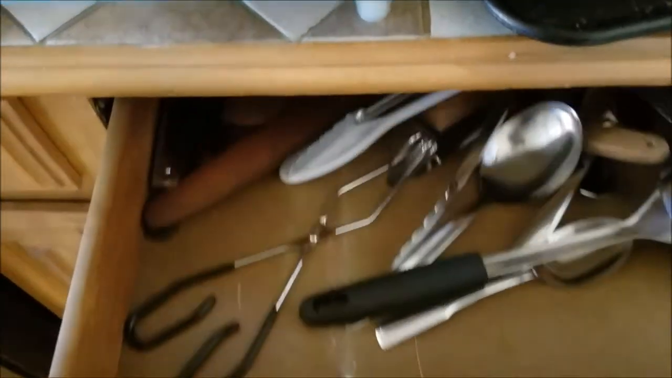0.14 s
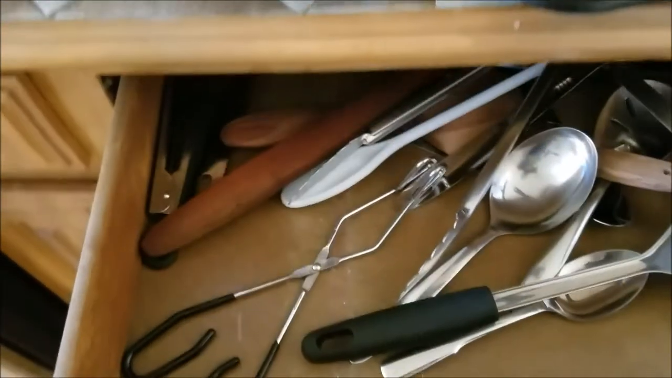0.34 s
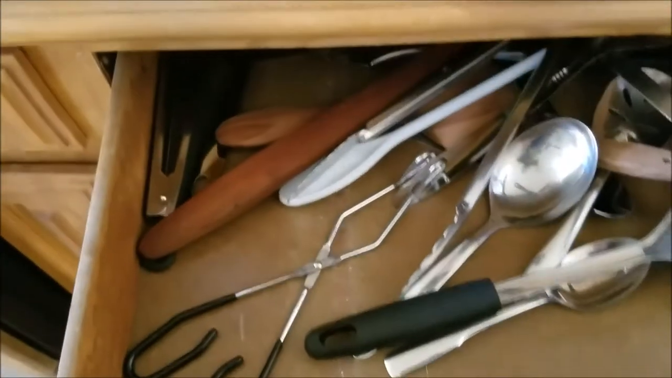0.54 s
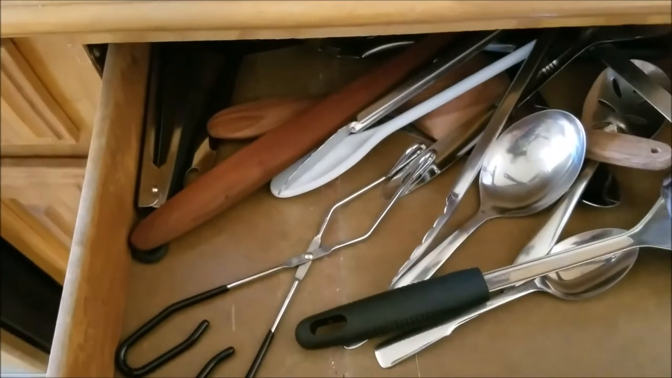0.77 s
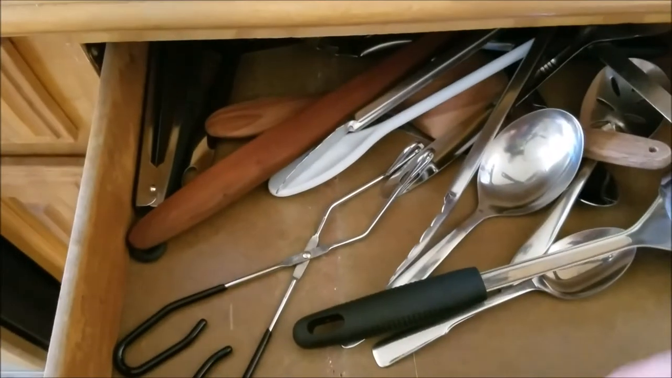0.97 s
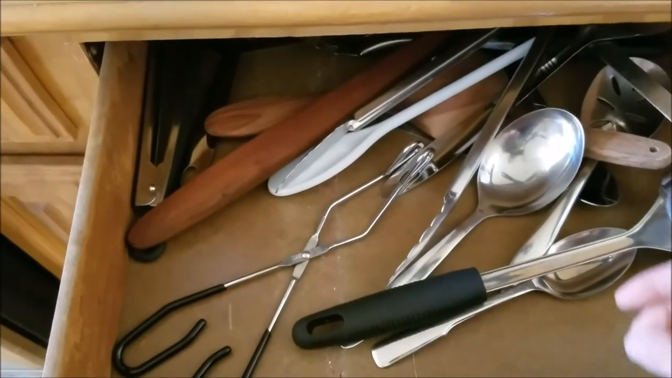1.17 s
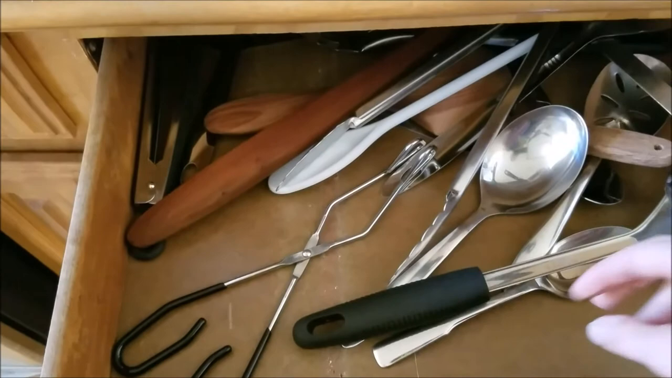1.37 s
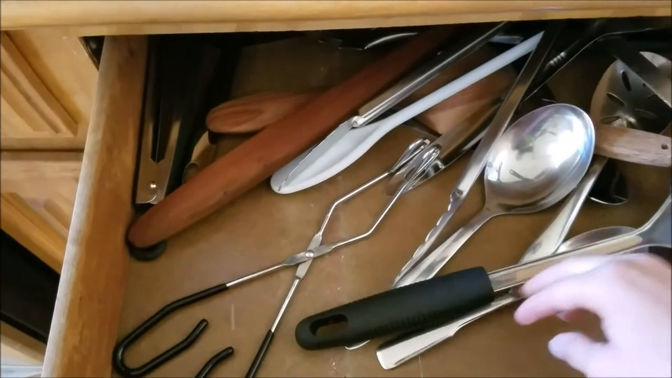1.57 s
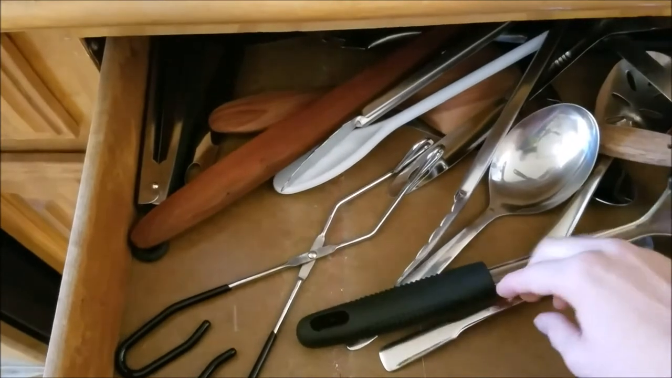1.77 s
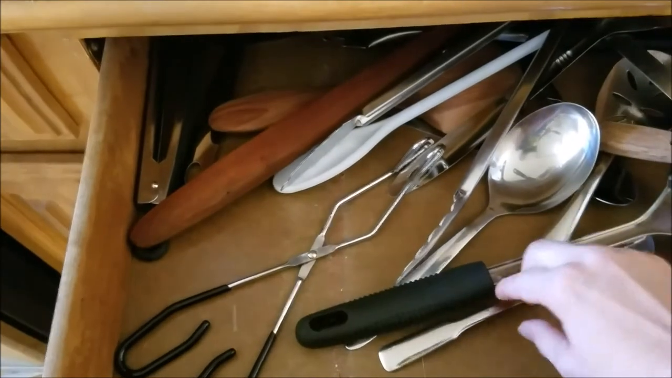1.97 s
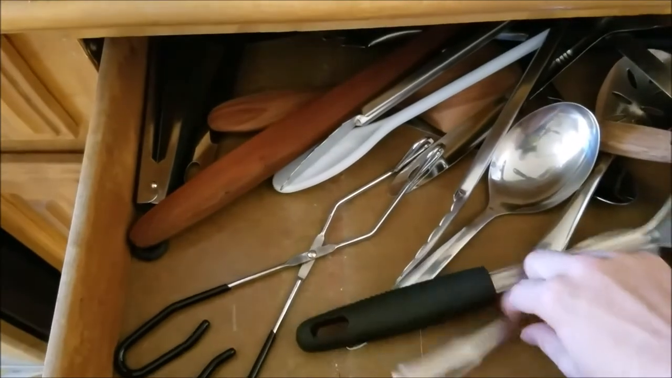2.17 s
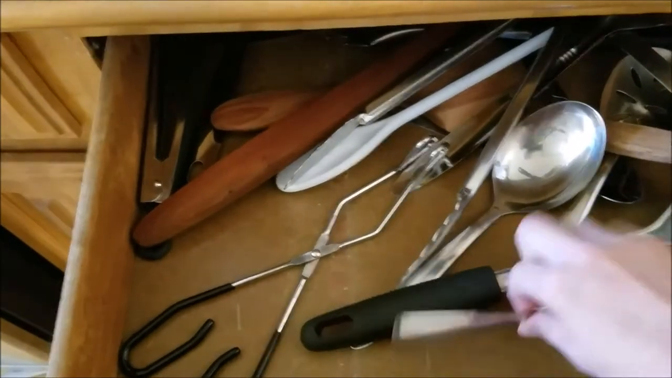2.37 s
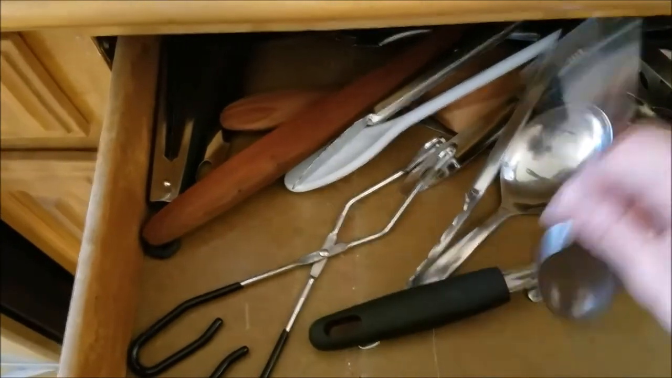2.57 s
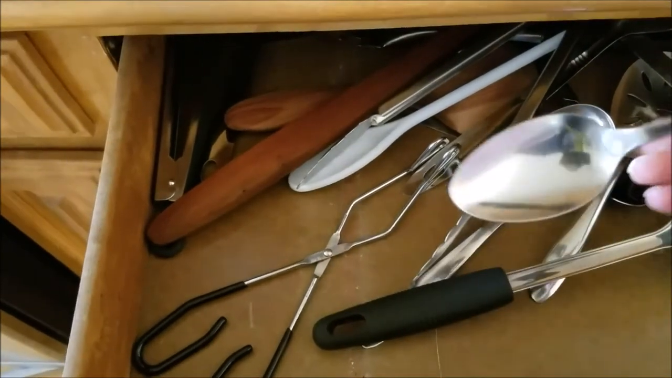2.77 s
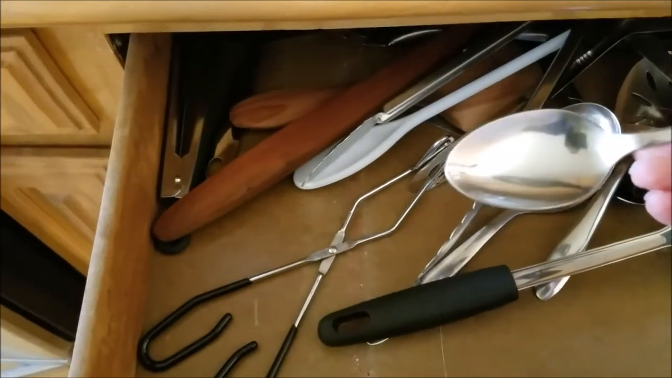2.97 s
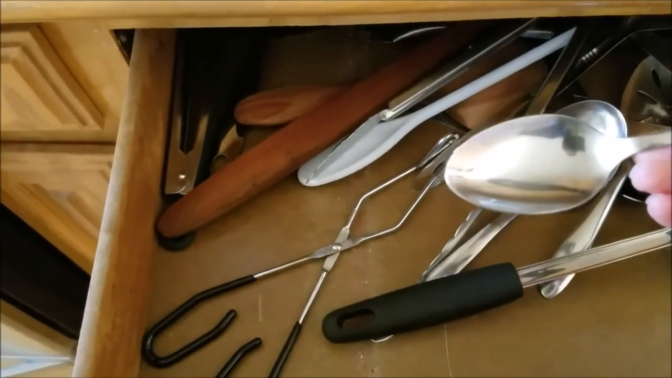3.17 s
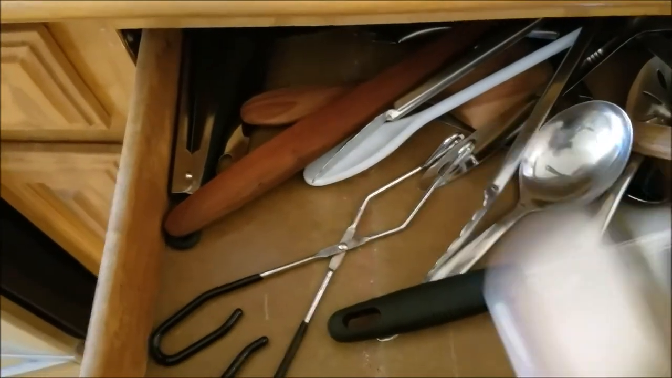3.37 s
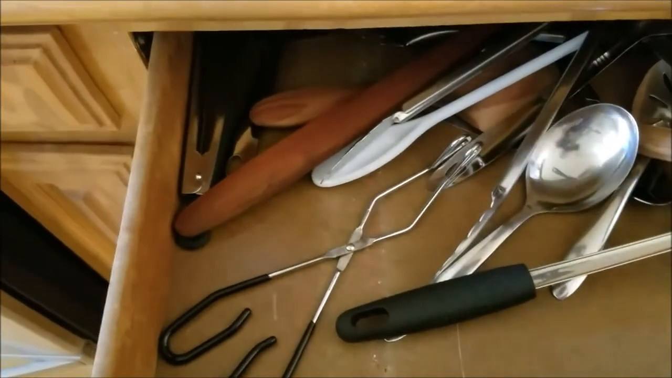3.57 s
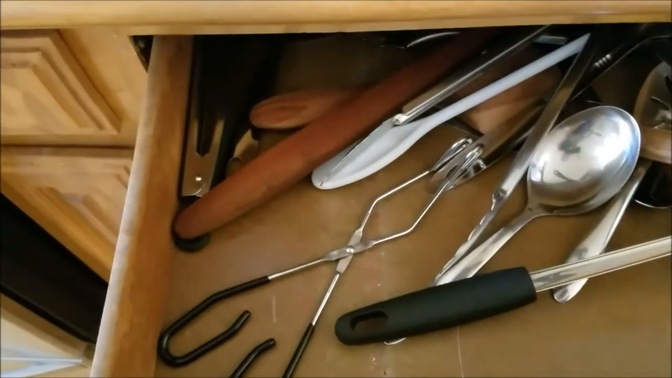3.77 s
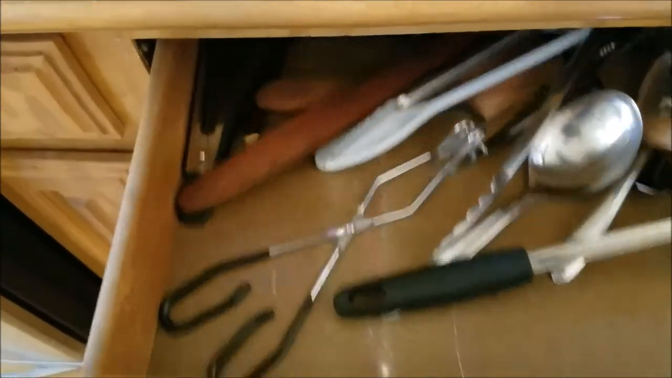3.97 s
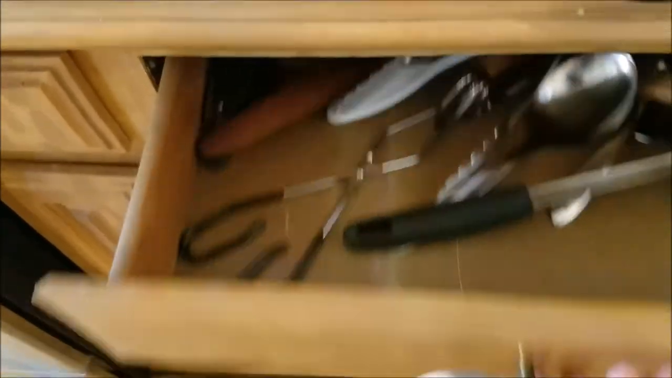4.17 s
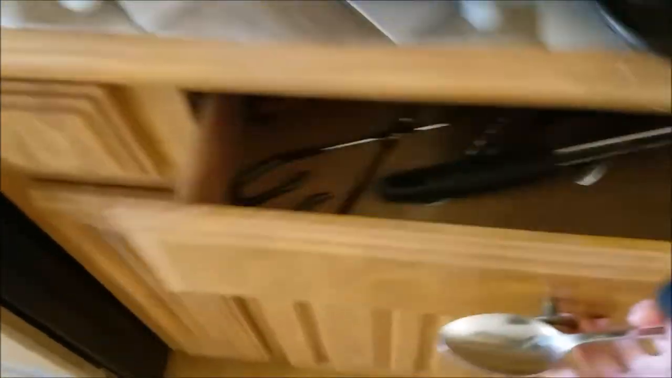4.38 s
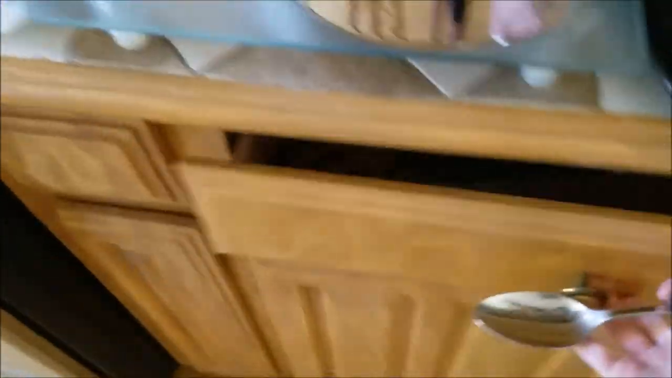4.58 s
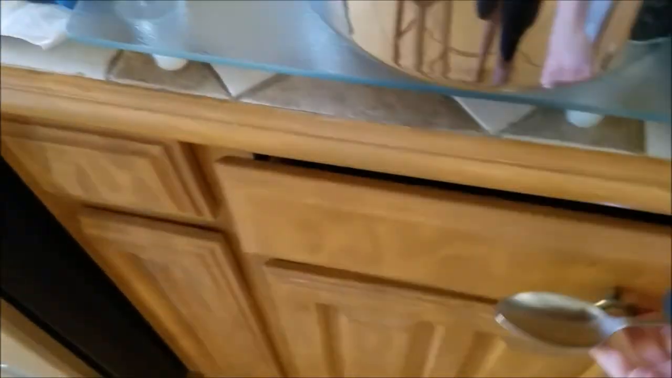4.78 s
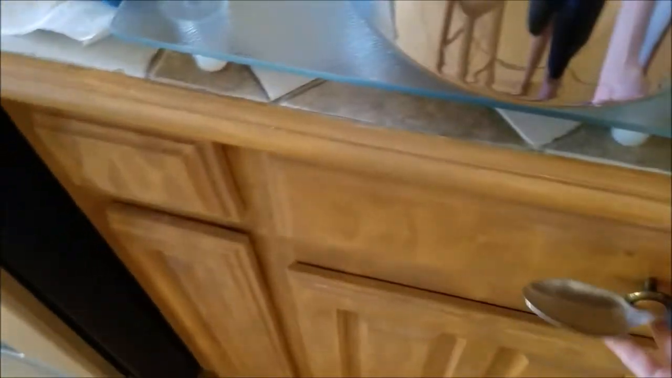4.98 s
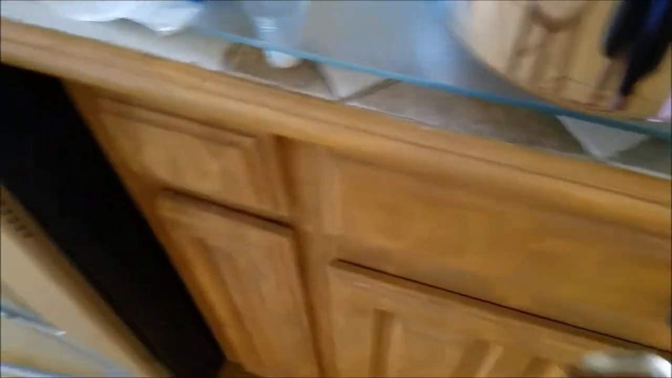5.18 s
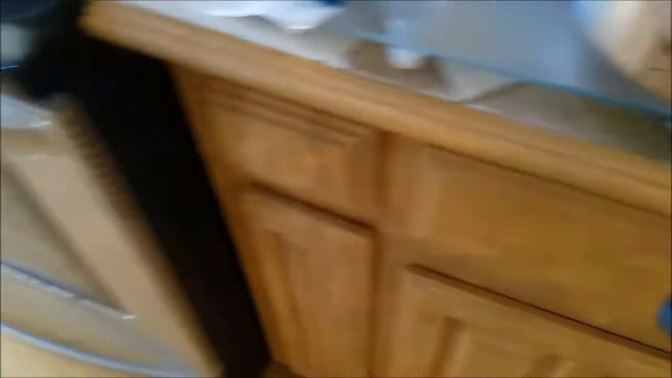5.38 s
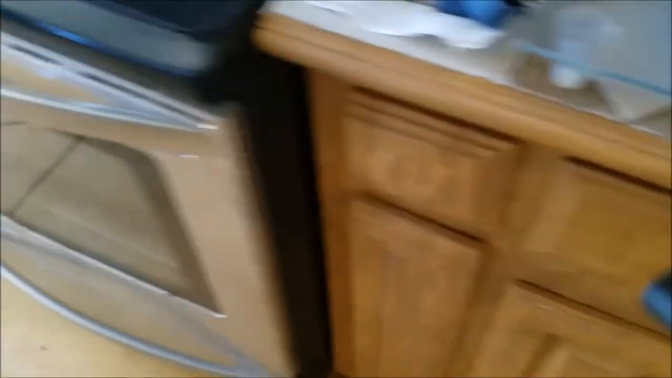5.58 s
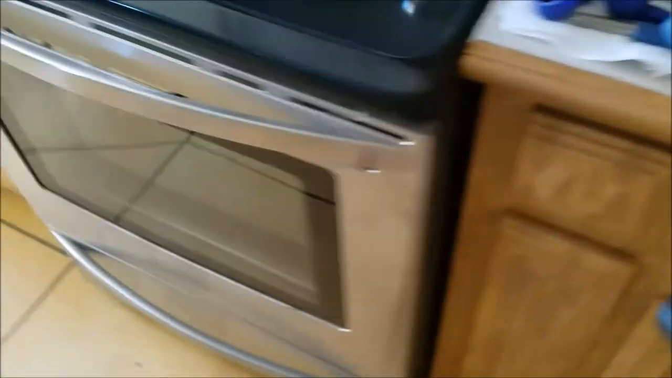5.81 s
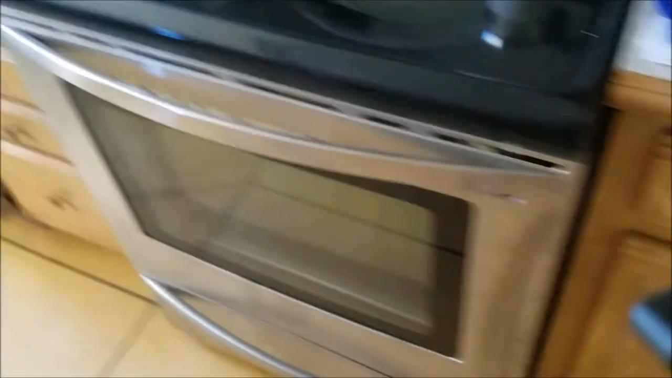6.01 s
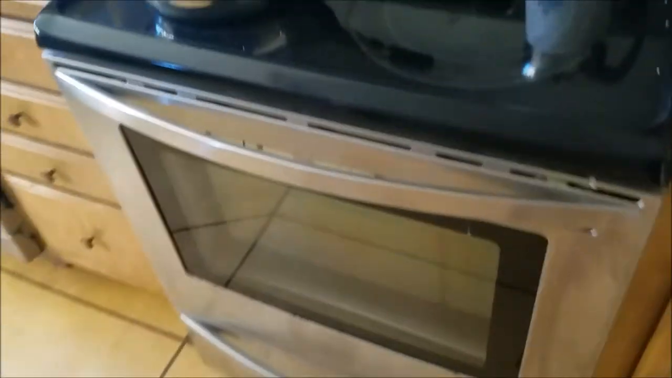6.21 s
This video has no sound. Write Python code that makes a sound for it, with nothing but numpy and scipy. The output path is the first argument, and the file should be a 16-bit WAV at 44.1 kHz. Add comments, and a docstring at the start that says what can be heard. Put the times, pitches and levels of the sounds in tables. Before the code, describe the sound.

In a quiet kitchen with low hum and faint hiss, close stereo microphones catch a wooden drawer sliding open from 0 to 0.5 s, with rough wood rubbing, a skid and sharp knocks at about 0.14, 0.2 and 0.4 s, and fine steel rattling. From 0.67 to 1.6 s a utensil rocks on the drawer bottom in soft dull taps, slightly quickening and fading. Fingers make light handle knocks at 1.65-1.7 s, then small ticks and scrapes from 2.1 s lead to a strong woody clack with a brief bright spoon clink at 2.4 s. Near silence and a tiny cloth rustle follow. A hollow handle knock comes at 3.77 s. From 4 s the drawer rolls shut, scraping and rattling most around 4.15-4.45 s, and closes with a double thump at 4.93-4.99 s. Short reverberation, soft cloth movement near 5.4 s and faint knocks at 5.8-5.9 s end it.

```python
"""In a quiet kitchen a wooden drawer slides open and its steel utensils shift and rock; a hand lifts a
spoon out, a handle is knocked, and the drawer rolls shut with a double bump, heard by two close microphones.
Contact forces set the damped modes of wood, handles and steel ringing; rubbing is dense random impacts.
Cloth, steady air noise and the reverberation of the room are shaped noise."""
import sys
import numpy as np
from scipy import signal
from scipy.fft import rfft, irfft
from scipy.io import wavfile

SR = 44100
rng = np.random.default_rng(int(sys.argv[2]) if len(sys.argv) > 2 else 0)


def inscribe(sig):
    """Save sig as 16-bit PCM at rate SR to the path in sys.argv[1].

    A 1-D sig is mono; a 2-D sig holds one channel per row.
    Samples are clipped to [-1, 1] before scaling.
    """
    pcm = np.round(np.clip(np.atleast_2d(sig).T, -1, 1) * 32767)
    wavfile.write(sys.argv[1], SR, pcm.astype(np.int16))


N = 275492  # samples

# damped modes of the cabinet, drawer board, panel and the handles lying on the wood:
# frequency_hz, relative_level_db, t60_s
CABINET_MODES = [(45, -8, .15), (62, -4, .16), (80, -6, .12), (98, 0, .2), (125, -7, .12), (190, -9, .08)]
BOARD_MODES = [(235, -14.5, 0.027), (298.5, -2.5, 0.13), (312.8, 4, 0.16), (332, -3.5, 0.14),
               (370, -3, 0.076), (419.7, -1.5, 0.085), (478, -8, 0.082), (541.6, -4.5, 0.081)]
PANEL_MODES = [(620, 0, 0.028), (724.4, -2, 0.057), (801, -4, 0.044), (877, -4, 0.044), (1066, 0.5, 0.0067)]
HANDLE_MODES = [(1220, -3, .035), (1380, 0, .05), (1550, -3, .03), (1720, -3, .035), (1880, -6, .025),
                (2030, -6, .025), (2200, -8, .02), (2430, -6, .03), (2740, -4, .03), (3300, -16, .015)]


def knocks():
    """Impact excitation: utensils strike the drawer; its own jolts shake cabinet and panel only."""
    # utensils knock on the drawer: start_s, board_db, handles_db, crack_db (before coupling)
    knock_events = [(0.049, -50.5, -42.5, -35), (0.139, -14, -20.5, -21.5), (0.21, -17, -36.5, -32.5),
                    (0.318, -33, -39, -55), (0.408, -17.5, -62, -34.5), (1.587, -37, -69, -70),
                    (1.646, -18, -25.5, -48.5), (1.667, -21.5, -53, -45.5), (1.706, -17, -24.5, -38),
                    (1.78, -49, -40, -57), (1.844, -56, -45.5, -79), (1.871, -37, -46.5, -75),
                    (1.928, -60.5, -52.5, -83), (2.009, -35, -61.5, -76), (2.068, -57, -40, -56),
                    (2.167, -24, -38.5, -54), (2.276, -19, -37, -58), (2.398, -24.5, -21.5, -20.5),
                    (2.408, -19, -26, -27.5), (2.423, -7.5, -19, -45), (3.688, -33.5, -35.5, -50.5),
                    (3.769, -11, -7.5, -54), (3.852, -63, -19.5, -43.5), (4.278, -37, -32, -46.5),
                    (4.726, -52, -56.5, -61.5), (4.78, -40, -31.5, -56.5), (4.861, -32.5, -53, -58.5),
                    (4.931, -13, -13, -28.5), (4.988, -15, -15.5, -55), (5.806, -35, -54, -79),
                    (5.932, -38.5, -55.5, -77)]
    # the moving drawer jolts on its runners and stops: start_s, cabinet_thud_db, panel_db (before coupling)
    jolt_events = [(0.132, -34, -21), (0.21, -32, -32), (0.41, -25, -46), (4.05, -24, -33),
                   (4.164, -35, -21.5), (4.389, -38, -21), (4.931, -11, -13.5), (4.988, -12.5, -20)]
    knock_decay_ms, jolt_decay_ms = 7.3, 4.4  # time constants of the chatter after each blow
    events = [(start_s, passed_on(*levels_db), knock_decay_ms) for start_s, *levels_db in knock_events]
    for start_s, thud_db, panel_db in jolt_events:
        gains = [from_db(thud_db), 0, from_db(panel_db), 0, 0, 0]
        events.append((start_s, gains, jolt_decay_ms))
    return contacts(events, blow)


def skids():
    """Friction excitation: short skids whose force builds up and lets go instead of striking."""
    # start_s, board_db, handles_db, crack_db (before coupling), swell_ms (time to the envelope's peak)
    skid_events = [(0.124, -9, -25.5, -23.5, 16.4), (0.397, -21.5, -23.5, -24.5, 20.5),
                   (2.133, -26, -62, -57, 13), (2.224, -29.5, -28, -61, 11), (2.243, -18.5, -21, -37, 9),
                   (2.33, -26, -29.5, -62, 5.9), (2.459, -13, -34, -43, 8.0),
                   (3.979, -23.5, -31.5, -48, 15), (4.043, -34, -34.5, -38.5, 14),
                   (4.134, -49, -24, -34, 22), (4.159, -10.5, -31.5, -38, 5.6), (4.316, -23, -37, -55, 2.5),
                   (4.362, -18.5, -21.5, -30.5, 5.9), (4.386, -16, -27.5, -41, 5.3),
                   (4.635, -28, -32.5, -44, 12), (4.944, -13.5, -24.5, -36, 13), (5.815, -37, -61, -60, 15)]
    events = [(start_s, passed_on(*levels_db), swell_ms) for start_s, *levels_db, swell_ms in skid_events]
    return contacts(events, lambda noise, age, share: noise * age * np.exp(-age))


def blow(noise, age, share):
    """Impulsive force: a first blow and a short chatter that decays exponentially."""
    return (age == 0) + share * noise * np.exp(-age)


def passed_on(board_db, handles_db, crack_db):
    """Vibration transmission: gains into cabinet, board, panel, handles, snap and sizzle."""
    board, handles, crack = from_db([board_db, handles_db, crack_db])
    cabinet = board * from_db(-26.5)
    panel = board * from_db(-16) + handles * from_db(-10.5)
    sizzle = crack * from_db(-4.5)
    return [cabinet, board, panel, handles, crack, sizzle]


def contacts(events, shape):
    """Modal excitation: each contact's unit-energy force drives the wood, handles and treble bands."""
    # rows are cabinet, board, panel, handles, snap, sizzle:
    # coupling_db, chatter_share (relative to the first blow), left_right_db
    coupling = [(-9, 0.026, 1.5), (-14, 0.078, -1), (-2.5, 0.22, 1), (-3.5, 0.44, -2.5), (26.5, 0.45, -2.5),
                (26, 0.33, -3)]
    place_spread_ms = .07  # contacts lie all over the drawer, so each reaches the left ear early or late
    length = 4000  # samples
    coupling_db, share, pan_db = np.transpose(coupling)
    force = np.zeros((6, 2, N + length + 100))
    t_ms = 1000 * np.arange(length) / SR
    chatter = rng.standard_normal((len(events), 6, length))
    lags = rng.normal(0, place_spread_ms * SR / 1000, len(events))
    lags = np.clip(lags, -20, 20).round().astype(int)
    for (start_s, gains, time_ms), noise, lag in zip(events, chatter, lags):
        burst = shape(noise, t_ms / max(time_ms, .3), share[:, None])
        burst = burst / np.sqrt(np.sum(burst ** 2, axis=1, keepdims=True))
        burst = (from_db(coupling_db) * gains)[:, None] * burst
        start = round(start_s * SR)
        force[:, 0, start + lag:start + lag + length] += burst
        force[:, 1, start:start + length] += burst
    force = force[..., :N] * from_db(pan_db[:, None, None] * [[.5], [-.5]])
    bodies = [CABINET_MODES, BOARD_MODES, PANEL_MODES, HANDLE_MODES]
    resonant = sum(body(drive, modes) for drive, modes in zip(force, bodies))
    return resonant + bright(*force[4:])


def bright(scrape, fine):
    """Band-limited contact noise: the treble has no modes, only a band of snap and one of sizzle."""
    return band(scrape, 2600, 6500) - band(fine, 7500, 17500)


def steel_touches():
    """Modal ringing: steel touches steel and the spoon or a long utensil sounds."""
    # spoon, then long utensil: start_s, relative_level_db, tilt_db_per_octave (about the middle mode)
    spoon_events = [(0.3185, -50, 0), (1.705, -30.5, 4), (1.7794, -48, -15), (2.1774, -56, -4.5),
                    (2.294, -44.5, 0), (2.3977, -7.5, -8), (2.423, -24.5, -2.5), (3.4131, -53, 2),
                    (3.7708, -34, -6), (3.851, -31, -16), (4.058, -38, 3), (4.162, -36, -11),
                    (4.3171, -52, 3), (4.398, -38, 4), (4.645, -48, 4.5), (4.8363, -38, -1)]
    tong_events = [(2.0665, -36, -7)]
    # their modes: frequency_hz, relative_level_db, t60_s
    spoon_modes = [(6000, -25, .06), (9300, -13, .1), (9630, -6, .045), (11670, -10, .05),
                   (12650, -2, .045), (12840, -18, .08), (14050, -11, .05), (14500, -13, .06),
                   (14850, 0, .05), (15680, -5, .04)]
    tong_modes = [(2960, -2, .08), (3680, -4, .08), (4950, -2, .2), (5250, 0, .07), (6070, -3, .13),
                  (8090, -5, .3), (11730, -12, .08)]
    both = clinks(spoon_events, spoon_modes, offset_db=-11.5) + clinks(tong_events, tong_modes, offset_db=-11.5)
    return both * from_db([[-2.5], [2.5]])


def clinks(events, modes, offset_db):
    """Modal superposition: each touch strikes every steel mode with a strength of its own."""
    start_s, level_db, tilt = np.array(events).T
    luck_db = rng.normal(0, 4, (len(modes), len(events)))
    middle = np.mean(np.log2([hz for hz, db, t60 in modes]))
    starts = np.round(start_s * SR).astype(int)
    out = np.zeros(N)
    for (hz, db, t60), own_db in zip(modes, luck_db):
        clicks = np.zeros(N)
        tilt_db = tilt * (np.log2(hz) - middle)
        clicks[starts] = from_db(level_db + db + offset_db + own_db + tilt_db)
        out += ring(clicks, hz, t60)
    return out


def slides():
    """Roughness excitation: rubbing is dense small impacts that drive the wood, and finer ones that hiss."""
    # one list each as the drawer opens, the spoon is drawn out and the drawer shuts:
    # time_s, wood_db, steel_db (before the layer gains)
    rubs = [
        [(0.0, -37, -63.5), (0.378, -46.5, -67.5), (0.458, -32, -51.5), (0.566, -48, -77.5), (0.64, -67, -88)],
        [(1.64, -51, -83), (2.114, -66, -96), (2.22, -43, -70), (2.396, -42, -88), (2.6, -67, -80)],
        [(3.68, -78, -79), (3.74, -44.5, -73.5), (3.868, -63, -81), (4.064, -42.5, -67), (4.238, -36.5, -61.5),
         (4.345, -40.5, -62), (4.41, -32.5, -57.5), (4.69, -55, -77.5), (4.915, -43, -75), (4.97, -28, -50),
         (5.158, -52, -82.5), (5.25, -71, -94)],
    ]
    # cabinet gain under each of the three rubs: level_db
    cabinet_levels = [-3.5, -24, -4]
    shared = judder(24, 2.2)
    board, steel = envelope(rubs, 1), envelope(rubs, 2)
    cabinet = sum(from_db(db) * envelope([rows], 1) for rows, db in zip(rubs, cabinet_levels))
    panel = from_db(-3) * board
    layers = [(cabinet, CABINET_MODES, .05), (board, BOARD_MODES, .12),
              (panel, PANEL_MODES + HANDLE_MODES, .8)]
    wood = 0
    for gain, modes, apart in layers:
        wood = wood + gain * spread(lambda: body(shared * grains(1500, 4.2), modes), apart)
    fine = shared * spread(lambda: grains(9000, 2.0), .7)
    hiss = bright(from_db(16.5) * steel * fine, from_db(9) * steel * fine)
    return wood + (hiss + rattles(steel)) * from_db([[-1.5], [1.5]])


def judder(rate_hz, depth_db):
    """Stick and release of the runner: slow low-passed noise makes a gain that wanders at random."""
    settle = 8000  # samples dropped while the filter starts
    r = np.exp(-2 * np.pi * rate_hz / SR)
    slow = signal.lfilter([1], [1, -2 * r, r * r], rng.standard_normal(N + settle))[settle:]
    return rms_one(from_db(depth_db * rms_one(slow)))


def rattles(shaking):
    """Random impact excitation: loose cutlery touches, each touch ringing briefly at one of 28 pitches."""
    touches = shaking * grains(120, 2.5)
    pitches_hz = np.geomspace(4000, 15500, 28)
    dealt = rng.integers(0, 28, N)
    rings = sum(ring(touches * (dealt == k), hz, .04) for k, hz in enumerate(pitches_hz))
    return from_db(-22.5) * rings


def rocking(count=6):
    """Damped rocking: a ladle on its bowl taps the drawer bottom, ever sooner and softer.

    The first swings, all but the last two, have a weaker tap on the way back."""
    # modes of the tapped drawer bottom: frequency_hz, relative_level_db, t60_s
    tap_modes = [(248, 15, 0.033), (307, -8, 0.14), (463, -0.5, 0.057), (1304, -2.5, 0.029)]
    start_s, first_period_s, back_after_s = .666, .191, .132
    speedup = .958  # ratio of each period to the one before
    strong_db, loss_per_swing_db, back_db = -48.5, 2.2, -64.5  # tap levels before the modes
    swing = np.arange(count)
    tap_s = start_s + first_period_s * (1 - speedup ** swing) / (1 - speedup)
    taps = np.zeros(N)
    taps[(tap_s * SR).astype(int)] = from_db(strong_db - loss_per_swing_db * swing)
    taps[((tap_s[:-2] + back_after_s) * SR).astype(int)] = from_db(back_db)
    return body(taps, tap_modes)


def rustle():
    """Friction noise of cloth: soft band-passed grains, independent in each ear."""
    # sleeve and hand moving, one list for each movement: time_s, level_db
    movements = [
        [(1.2, -94), (1.33, -72.5), (1.64, -72.5)],
        [(3.35, -91), (3.446, -73), (3.5, -76)],
        [(5.25, -76), (5.4, -59), (5.518, -75), (6.2, -72)],
    ]
    cloth = np.array([grains(9000, 4.5), grains(11000, 2.6)])
    return envelope(movements, 1) * rms_one(band(cloth, 440, 3300))


def kitchen(x):
    """Reverberant decay: octave bands of noise, each dying at its own rate after a short build-up."""
    # frequency_hz, t60_s, level_db, left_right_likeness
    room = [(100, .3, -6, .97), (300, .33, -2, .95), (1000, .35, 0, .1), (3000, .33, 0, .1),
            (8000, .3, -2, .05), (15000, .25, -2, .05)]
    t = np.arange(SR // 2) / SR
    noise = likeness_pair(rng.standard_normal((2, len(t))), room, 3)
    build_up = np.minimum(t / 0.00073, 1)
    tail = 0
    for low_hz in 40 * 2. ** np.arange(9):
        middle_hz = low_hz * np.sqrt(2)
        decay = from_db(-60 * t / at_hz(room, middle_hz)) * build_up
        decay = decay / np.sqrt(np.sum(decay ** 2))
        octave = band(noise, low_hz, min(2 * low_hz, .45 * SR))
        tail = tail + octave * decay * from_db(at_hz(room, middle_hz, 2))
    return signal.fftconvolve(x[None], tail, axes=1)[:, :N]


def air():
    """Stationary noise: the kitchen's steady hum and the microphones' hiss, partly alike in both ears."""
    # spectrum shape: frequency_hz, relative_level_db
    air_spectrum = [(12, -36.5), (20, -2), (22, -20), (38, -9), (65, -14.5), (79, -8.5), (101, -8),
                    (130, -9.5), (146, -15), (248, -23), (558, -26.5), (849, -28), (2530, -32),
                    (7110, -45.5), (16000, -38.5)]
    # frequency_hz, left_right_likeness (below 0 counts as 0)
    air_likeness = [(60, 1), (240, 0.5), (950, 0.06), (3770, -0.08), (15000, -1)]
    pair = likeness_pair(rng.standard_normal((2, N)), air_likeness, 1)
    return from_db(-63) * rms_one(colour(pair, air_spectrum))


def likeness_pair(noise, points, column):
    """Interaural coherence: mix two noises into left and right, alike by each frequency's share."""
    hz = np.maximum(np.fft.rfftfreq(noise.shape[1], 1 / SR), 1)
    alike = np.clip(at_hz(points, hz, column), 0, 1)
    mid, side = rfft(noise)
    pair = np.sqrt(1 + alike) * mid + np.sqrt(1 - alike) * side * [[1], [-1]]
    return irfft(pair, noise.shape[1])


def spread(make, apart):
    """Partial coherence of a long contact line: each ear hears a share of impacts of its own."""
    middle = rms_one(make())
    difference = rms_one(make()) * [[1], [-1]]
    return rms_one(middle + apart * difference)


def grains(per_s, spread_db):
    """Random impact train: tiny clicks of uneven size and either sign, scaled to rms 1."""
    sizes = from_db(spread_db * np.minimum(rng.exponential(1, N), 5))
    signs = rng.choice([-1, 1], N)
    return rms_one(sizes * signs * (rng.random(N) < per_s / SR))


def body(x, modes):
    """Modal superposition: all modes of one object, which radiates little far below its lowest mode."""
    rings = sum(from_db(db) * ring(x, hz, t60) for hz, db, t60 in modes)
    radiation = signal.butter(2, 0.82 * modes[0][0], "high", fs=SR, output="sos")
    return signal.sosfilt(radiation, rings)


def ring(x, hz, t60):
    """Damped resonator: a unit click starts a decaying sine of height 1."""
    r = from_db(-60 / (t60 * SR))
    w = 2 * np.pi * hz / SR
    return signal.lfilter([0, np.sin(w)], [1, -2 * r * np.cos(w), r * r], x + 1e-18)


def band(x, low_hz, high_hz):
    """Band limiting: a gentle band-pass."""
    return signal.sosfilt(signal.butter(2, [low_hz, high_hz], "band", fs=SR, output="sos"), x)


def colour(x, points):
    """Spectral shaping: weight steady noise by a table of levels."""
    hz = np.maximum(np.fft.rfftfreq(N, 1 / SR), 1)
    return irfft(rfft(x) * from_db(at_hz(points, hz)), N)


def at_hz(points, hz, column=1):
    """Logarithmic frequency scale: interpolate a table column along it."""
    points = np.array(points)
    return np.interp(np.log(hz), np.log(points[:, 0]), points[:, column])


def envelope(tables, column):
    """Amplitude envelope: gain over time from a dB column, silent between the tables."""
    t, out = np.arange(N) / SR, np.zeros(N)
    for rows in tables:
        rows = np.array(rows)
        out += from_db(np.interp(t, rows[:, 0], rows[:, column], left=-200, right=-200))
    return out


def from_db(db):
    """Logarithmic level: decibels to amplitude gain."""
    return 10 ** (np.asarray(db) / 20)


def rms_one(x):
    """Effective value: scale to rms 1."""
    return x / np.sqrt(np.mean(x ** 2) + 1e-20)


def scene():
    """Superposition with interaural delay: the drawer lies nearer the right microphone."""
    left_lag_s = 0.09 / 1000
    near = knocks() + skids() + rocking() + steel_touches() + slides()
    # the cabinet is too small to radiate deeper
    near = signal.sosfilt(signal.butter(4, 52, "high", fs=SR, output="sos"), near)
    wet = kitchen(near.mean(0))
    hz = np.fft.rfftfreq(N, 1 / SR)
    near[0] = irfft(rfft(near[0]) * np.exp(-2j * np.pi * hz * left_lag_s), N)
    return near + wet + rustle() + air()


def record(dry):
    """Low-pass filtering: the top is cut, 60 dB down from 16.9 kHz."""
    return signal.sosfilt(signal.cheby2(12, 60, 16900, fs=SR, output="sos"), dry)


dry = scene()
out = record(dry)
inscribe(out)
```